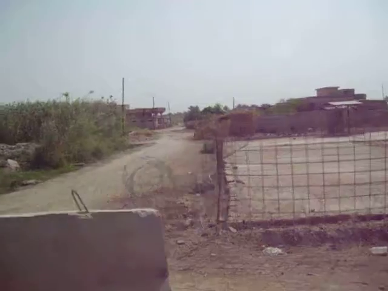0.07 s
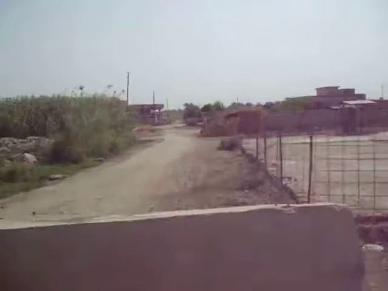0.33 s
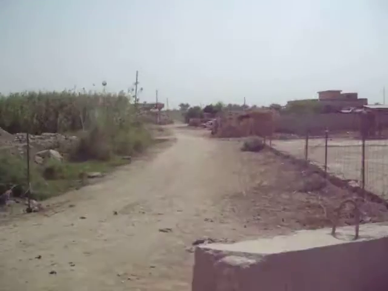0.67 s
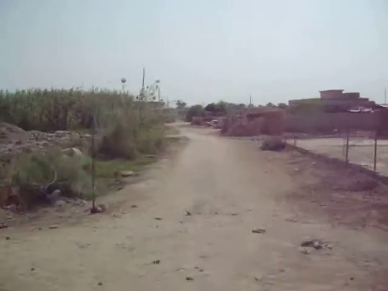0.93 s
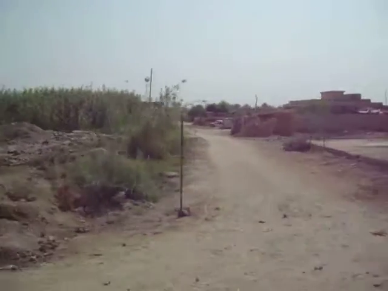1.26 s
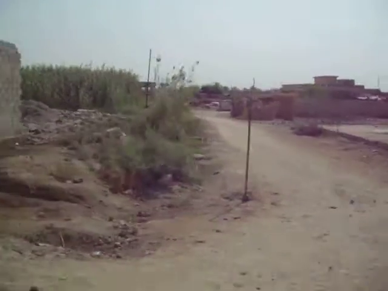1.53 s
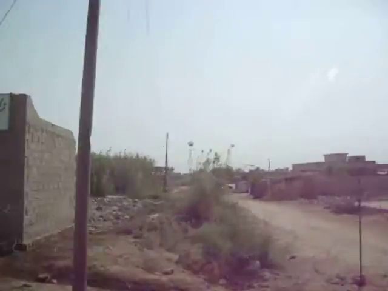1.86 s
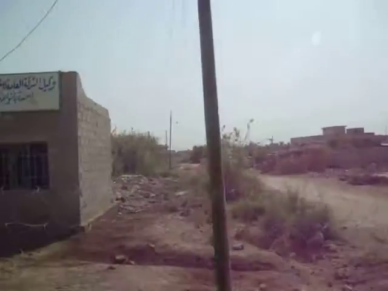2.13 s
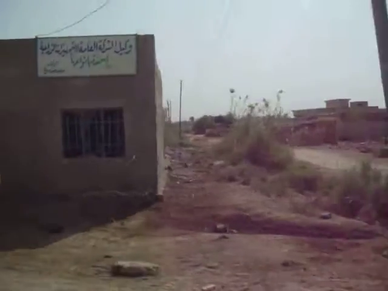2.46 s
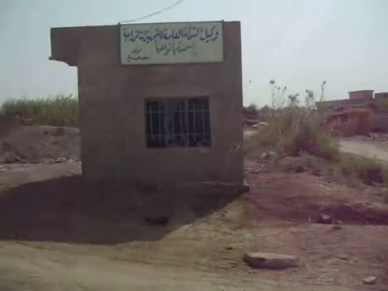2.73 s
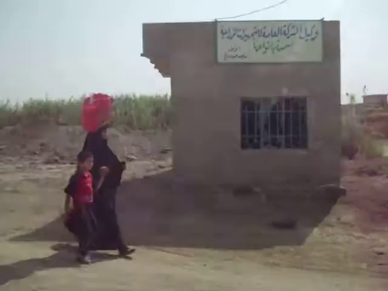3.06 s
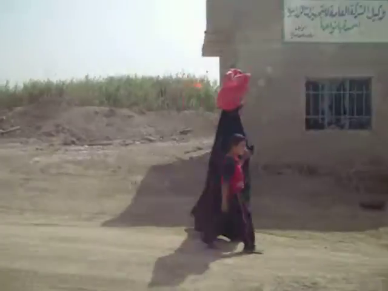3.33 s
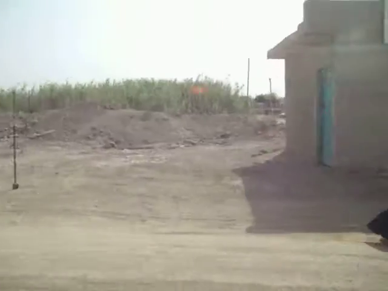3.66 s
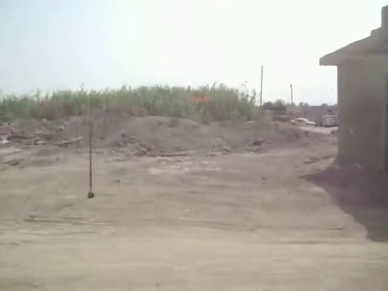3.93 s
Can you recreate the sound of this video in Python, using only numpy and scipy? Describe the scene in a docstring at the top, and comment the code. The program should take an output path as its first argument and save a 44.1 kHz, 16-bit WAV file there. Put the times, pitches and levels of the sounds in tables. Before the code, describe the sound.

A vehicle's engine drones with road rumble and rattles, heard from inside.

```python
"""Heavy vehicle on a dirt road

Inside, the periodic firing of six cylinders makes a drone, and the cabin's air booms in resonance.
The driveline's hum beats against it, and its whine swells through a turn. Tyres roar and crunch on grit,
ruts thud, stones tick, loose fittings rattle and squeak, and the body shudders late on. A blower and
wind lie beneath. All is heard through a small microphone of narrow band that rounds off the peaks."""
import sys
import numpy as np
from scipy import signal
from scipy.fft import rfft, irfft, next_fast_len
from scipy.io import wavfile
from scipy.ndimage import uniform_filter1d, map_coordinates

SR = 44100
rng = np.random.default_rng(int(sys.argv[2]) if len(sys.argv) > 2 else 0)


def transcribe(u):
    """Save the signal u as a 16-bit wav file named by the first command-line argument.

    u: samples, shape (n,) or (channels, n), limited to [-1, 1]; the rate is SR.
    q: integer samples, one column per channel.
    """
    v = np.clip(np.atleast_2d(u).T, -1, 1)
    q = np.round(v * 32767).astype(np.int16)
    wavfile.write(sys.argv[1], SR, q)


N = 176400

# Levels in the tables are relative; a spectrum gives only the shape of a noise.
# Engine firing tone: t/s, f/Hz, level/dB
FIRING = [(.07, 83.87, -12.5), (.15, 80.8, -22), (.22, 81, -11.5), (.5, 78.56, -18), (.8, 77.6, -15),
          (1.3, 77.82, -11), (1.62, 78.07, -11), (1.8, 77.43, -15.5), (1.92, 76.5, -11.5),
          (2.45, 77.7, -15.5), (2.7, 77.46, -20.5), (3.05, 78.78, -25.5), (3.2, 79.85, -14),
          (3.55, 78.55, -15), (4, 77.7, -14.5)]
# Engine orders: cycles per working cycle
ENGINE_ORDERS = [3, 5, 7, 8, 12, 24]
# Those orders against the firing tone: level/dB
ORDER_LEVELS = [-18.5, -8, -6, -15.5, -13, -29.5]
# Driveline rotation: t/s, hum f/Hz, hum level/dB, whine level/dB
HUM_AND_WHINE = [(.1, 82.8, -20.5, -20.5), (.4, 82.87, -19.5, -22.5), (.6, 83.82, -18, -34.5),
                 (1.3, 83, -22.5, -38), (2.4, 82.15, -22.5, -31), (2.6, 85.1, -20, -20),
                 (2.86, 89.17, -14, -17), (3.13, 83.1, -15, -17.5), (3.22, 82.28, -24, -40),
                 (4, 87.33, -20, -28.5)]
# Roughness of the ride: t/s, rumble level/dB, roar level/dB
ROUGHNESS = [(.08, -16.5, -18), (.17, -19.5, -18), (.27, -22, -26), (.45, -20, -23.5), (.8, -18, -21.5),
             (1.02, -21, -21.5), (1.15, -21, -22), (1.44, -19.5, -22.5), (1.66, -21.5, -23.5),
             (1.86, -17.5, -20), (1.94, -25.5, -24), (2.02, -17, -18), (2.12, -18.5, -21),
             (2.22, -20, -23.5), (3.13, -20, -22.5), (3.26, -21.5, -27), (3.39, -18.5, -22.5),
             (3.48, -24, -27), (3.62, -19, -22), (3.97, -20.5, -24)]
# Grit under the tyres: t/s, level/dB
GRIT_LEVELS = [(.08, -35.5), (.14, -36), (.22, -39), (.35, -42.5), (.46, -39), (.6, -40.5), (1.3, -40.5),
               (1.5, -39.5), (1.6, -43.5), (1.87, -36.5), (1.95, -42), (2.01, -38), (2.12, -37.5),
               (2.22, -42), (2.42, -38.5), (2.58, -41.5), (2.88, -40), (3.25, -41.5), (3.39, -39.5),
               (3.47, -46), (3.62, -39.5), (3.97, -40)]
# Chassis rumble: f/Hz, level/dB
RUMBLE_SPECTRUM = [(12, -14), (25, -8.5), (48, 2), (65, -0.5), (110, 0), (160, 2), (200, -3.5), (280, -2.5),
                   (350, -4.5), (420, -8), (600, -40)]
# Tyre roar: f/Hz, level/dB
ROAR_SPECTRUM = [(180, -30.5), (300, 0), (338, -4.5), (368, -5), (397, -6.5), (435, -13), (483, -3.5),
                 (662, -9.5), (888, -12.5), (1600, -24), (2080, -46.5), (3520, -120)]
# Grit and stone impacts: f/Hz, level/dB
GRIT_SPECTRUM = [(880, -22), (1500, -4.5), (1910, -3.5), (2080, -2), (2290, -5.5), (2570, -3.5),
                 (3160, -12.5), (5070, -18.5), (5600, -26), (7280, -47.5), (12300, -120)]
# Knocks on the suspension: t/s, f/Hz, level/dB
RUTS = [(0.151, 164.5, -6), (.42, 300, -11.5), (0.541, 150, -9), (.855, 309, -8.5), (1.365, 159.8, -8.5),
        (1.56, 477, -17), (1.79, 288.3, -9.5), (2.1, 310, -11.5), (2.46, 486.7, -17), (2.625, 265, -14.5),
        (3.035, 341.3, -13.5), (3.115, 145.1, -10.5)]
# The body shaking on its mounts: t/s, level/dB
SHUDDER_LEVELS = [(0, -32.5), (3.05, -27.5), (3.38, -10.5), (3.6, -16.5), (3.72, -28), (3.9, -17.5)]
# Bumps that shake the fittings: t/s, clunk level/dB, jingle level/dB
BUMPS = [(.462, -47, -42), (0.828, -27, -49), (1.338, -16.5, -33.5), (1.973, -23.5, -35),
         (2.093, -22.5, -45.5), (3.872, -39, -42)]
# Modes of a panel: f/Hz, level/dB, T60/s
PANEL_MODES = [(825, -12, .06), (890, -2, 0.12), (990, -3.5, 0.054), (1200, -4, 0.029)]
# Modes of small metal parts: f/Hz, level/dB, T60/s
METAL_MODES = [(4030, 1, 0.031), (4210, -3, 0.036), (5160, -3.5, 0.031)]
# Rubbing fittings: t/s, duration/s, f/Hz, level/dB
RUBS = [(1.967, 0.14, 891, -23), (2.38, 0.046, 4127, -40)]
# Stones flung at the underside: t/s, level/dB
STONE_HITS = [(.561, -34), (0.833, -28.5), (1.023, -33), (1.72, -34), (1.999, -27), (2.136, -36),
              (3.593, -37), (3.713, -31)]
# One scrape of a tyre: middle t/s, duration/s, level/dB
TYRE_SCRAPE = (1.505, 0.089, -39.5)
# Sliding gravel: f/Hz, level/dB
SCRAPE_SPECTRUM = [(1200, -21), (2200, -3), (3200, -1), (4000, -15), (5500, -13)]
# Blower tones: f/Hz, level/dB
BLOWER_LINES = [(398.5, -33.5), (803, -48.5), (1113, -46.5)]
# Air along the body: f/Hz, level/dB
WIND_SPECTRUM = [(1200, -29), (2500, -1.5), (4000, -2.5), (5300, -8), (7000, -23.5)]


def engine(cylinders=6, throb_hz=3.1, throb_depth_db=.8):
    """Periodic excitation: uneven cylinders add orders to the firing tone; it throbs as the cabin rocks."""
    hz, level_db = curves(FIRING)
    cycles = np.cumsum(hz * (1 + .0042 * wobble(14))) / SR
    orders = sum(amp(db + 2.5 * wobble(7)) * tone(order * cycles / cylinders)
                 for order, db in zip(ENGINE_ORDERS, ORDER_LEVELS))
    firing = amp(1.6 * wobble(7.4)) * tone(cycles)
    throb_db = throb_depth_db * np.cos(2 * np.pi * throb_hz * (np.arange(N) / SR - .3))
    return amp(level_db + throb_db - 1.45) * (firing + orders)


def driveline():
    """Beating: a hum lies close to the firing tone; a rough whine sounds at three times its frequency."""
    hz, hum_db, whine_db = curves(HUM_AND_WHINE)
    cycles = np.cumsum(hz * (1 + .0039 * wobble(26))) / SR
    whine_cycles = 3 * cycles + .07 * wobble(110)
    whine = amp(whine_db + .52 * wobble(22)) * (tone(whine_cycles) + amp(-13.5) * tone(2 * whine_cycles))
    return amp(hum_db + 1.5 * wobble(10)) * tone(cycles) + whine


def road():
    """Random excitation: chassis rumble, tyre roar and grit, modulated together by the jolts of ruts."""
    rumble_db, roar_db = curves(ROUGHNESS)
    grit_db, = curves(GRIT_LEVELS)
    jolt_db = wobble(24.22)
    rumble = amp(rumble_db + 4.5) * coloured(rng.standard_normal(N), RUMBLE_SPECTRUM)
    roar = amp(roar_db + .52) * coloured(patchy(depth_db=1), ROAR_SPECTRUM)
    grains = impulses(per_s=94) * amp(2.5 * rng.random(N))
    hiss = coloured(patchy(depth_db=.83), GRIT_SPECTRUM)
    grit = amp(grit_db + .5) * (hiss + amp(-10) * coloured(grains, GRIT_SPECTRUM))
    return amp(jolt_db) * (rumble + roar) + amp(.96 * jolt_db) * grit


def thuds():
    """Damped vibration: ruts knock the suspension and the body answers with a short, dull note."""
    t = np.arange(N) / SR
    return sum(amp(db) * burst(s, fall_s=.08, rise_s=.013) * tone(hz * t + .15 * wobble(70))
               for s, hz, db in RUTS)


def cabin():
    """Resonance: the road drives the enclosed air, which booms, and the mounted body, which shudders."""
    shudder_db, = curves(SHUDDER_LEVELS)
    boom = amp(-23.5) * noise_band(hz=82.6, width_hz=24)
    return boom + amp(shudder_db) * noise_band(hz=30.5, width_hz=9)


def rattles(contacts=3, gap_s=.0073, loss_db=3.5, crack_t60_s=.03):
    """Repeated impact: each bump rings a panel and its metal parts in quick, weakening contacts."""
    t, out = np.arange(SR // 4) / SR, np.zeros(N + SR)
    for s, clunk_db, jingle_db in BUMPS:
        for k in range(contacts):
            start = int((s + k * gap_s * rng.uniform(.92, 1.2)) * SR)
            jingle = struck(METAL_MODES, t)
            crack = amp(2 - 60 * t / crack_t60_s) * rng.standard_normal(len(t))
            contact = amp(clunk_db) * struck(PANEL_MODES, t) + amp(jingle_db) * (jingle + crack)
            out[start:start + len(t)] += amp(-2.5 - k * loss_db) * contact
    return out[:N]


def squeaks():
    """Friction: rubbing fittings sing briefly at an unsteady pitch."""
    t = np.arange(N) / SR
    return sum(amp(db) * burst(s, fall_s, rise_s=.006) * tone(hz * t + .18 * wobble(130))
               for s, fall_s, hz, db in RUBS)


def gravel():
    """Impact noise: single stones tick on the underside; dense grains merge into a tyre's scrape."""
    ticks = sum(amp(db) * burst(s, fall_s=.013, rise_s=.00078) for s, db in STONE_HITS)
    middle_s, length_s, db = TYRE_SCRAPE
    swell = amp(db) * np.exp(-(2 * (np.arange(N) / SR - middle_s) / length_s) ** 2)
    scrape = swell * coloured(impulses(per_s=1200), SCRAPE_SPECTRUM)
    return ticks * coloured(rng.standard_normal(N), GRIT_SPECTRUM) + scrape


def blower():
    """Line spectrum: a blower hums in tones that drift slightly in level and phase."""
    t = np.arange(N) / SR
    return sum(amp(db + 1.9 * wobble(4.4)) * tone(hz * t + .16 * wobble(10)) for hz, db in BLOWER_LINES)


def wind():
    """Flow noise: air along the body makes a faint, even hiss."""
    return amp(-54) * coloured(rng.standard_normal(N), WIND_SPECTRUM)


def struck(modes, t, rise_s=.00087):
    """Free vibration: modes decay exponentially after one contact."""
    ring = sum(amp(db + rng.normal(0, 2) - 60 * t / t60) * tone(hz * (1 + .0029 * rng.normal()) * t)
               for hz, db, t60 in modes)
    return ring * (1 - np.exp(-t / rise_s))


def burst(s, fall_s, rise_s):
    """Transient envelope: a quick rise at s, then a decay of 20 dB per fall_s."""
    t = np.maximum(np.arange(N) / SR - s, 0)
    return (1 - np.exp(-t / rise_s)) * amp(-20 * t / fall_s)


def tone(cycles):
    """Harmonic motion: a sine of rms 1 and random starting phase."""
    return np.sqrt(2) * np.sin(2 * np.pi * (cycles + rng.random()))


def impulses(per_s):
    """Shot noise: impulses of random time and strength."""
    return (rng.random(N) < per_s / SR) * rng.standard_normal(N)


def patchy(depth_db):
    """Random modulation: white noise whose gain varies over time and frequency."""
    spectra = signal.stft(rng.standard_normal(N), nperseg=512)[2]
    patches = uniform_filter1d(rng.standard_normal(spectra.shape), size=7, axis=0)
    patches = uniform_filter1d(patches, size=9, axis=1)
    return signal.istft(spectra * amp(depth_db * unit(patches)), nperseg=512)[1][:N]


def noise_band(hz, width_hz):
    """Band-pass filtering: a steep-sided band of noise at rms 1."""
    noise = rng.standard_normal(N)
    return unit(filtered(noise, lambda f: 1 / np.sqrt(1 + (2 * (f - hz) / width_hz) ** 6)))


def coloured(x, spectrum):
    """Spectral shaping: x through a spectrum drawn on a log frequency axis, at rms 1."""
    f, db = np.transpose(spectrum)
    return unit(filtered(x, lambda hz: amp(np.interp(np.log(hz + 1), np.log(f + 1), db, right=-120))))


def filtered(x, response):
    """Linear filtering: the spectrum of x times a frequency response."""
    size = next_fast_len(N + SR // 2)
    return irfft(rfft(x, size) * response(np.fft.rfftfreq(size, 1 / SR)), size)[:N]


def wobble(knots_per_s):
    """Fluctuation: a smooth random curve."""
    return map_coordinates(rng.standard_normal(1024), [np.arange(N) * knots_per_s / SR], mode="mirror")


def curves(rows):
    """Interpolation: one value per sample for each column after the time."""
    s, *columns = np.transpose(rows)
    return [np.interp(np.arange(N) / SR, s, column) for column in columns]


def amp(db):
    """Decibels to amplitude ratio."""
    return 10 ** (np.asarray(db) / 20)


def unit(x):
    """Normalisation to rms 1."""
    return x / np.sqrt(np.mean(x ** 2) + 1e-20)


def scene():
    """Superposition: all sources add in the cabin."""
    drone = engine() + driveline() + blower() + cabin()
    return (drone + road() + thuds() + gravel() + rattles() + squeaks() + wind())[None]


def record(dry, ceiling=.71, knee=8.9, cutoff_hz=5740, start_s=.072, fade_s=.003, top_hz=17100):
    """Saturation and band limiting: the microphone rounds peaks, cuts treble and opens a moment late."""
    rounded = dry[0] / (1 + np.abs(dry[0] / ceiling) ** knee) ** (1 / knee)
    dulled = filtered(rounded, lambda hz: 1 / np.sqrt(1 + (hz / cutoff_hz) ** 60))
    t = np.arange(N) / SR
    gate = (t > start_s) * np.minimum(t[::-1] / fade_s, 1)
    return filtered(dulled * gate, lambda hz: hz < top_hz)[None]


dry = scene()
out = record(dry)
transcribe(out)
```